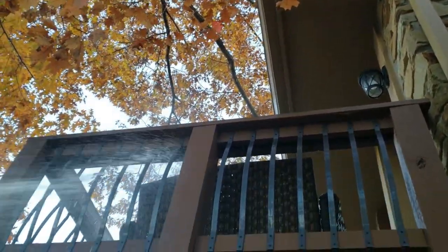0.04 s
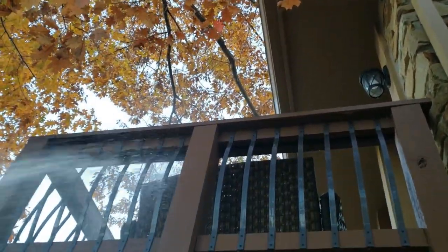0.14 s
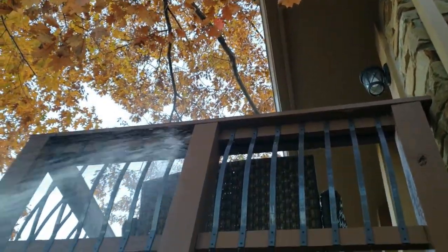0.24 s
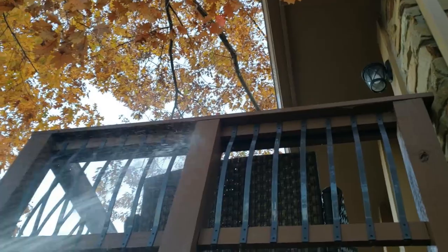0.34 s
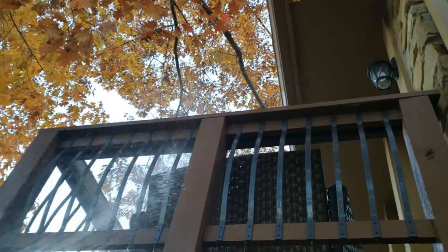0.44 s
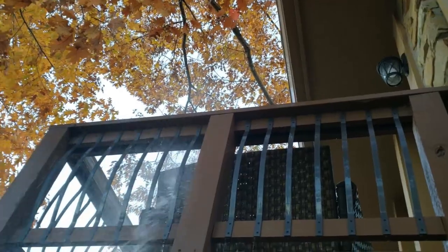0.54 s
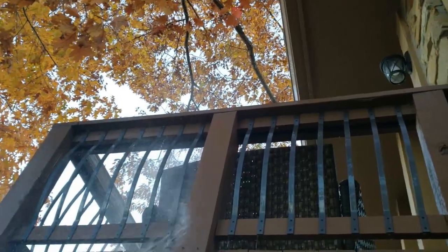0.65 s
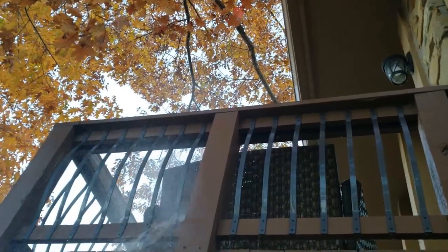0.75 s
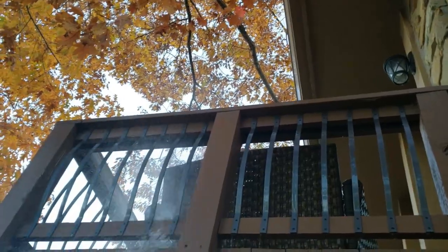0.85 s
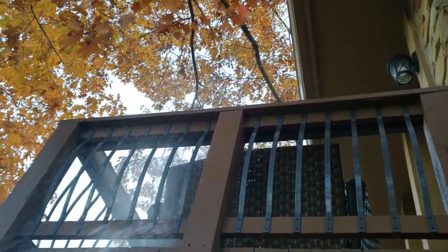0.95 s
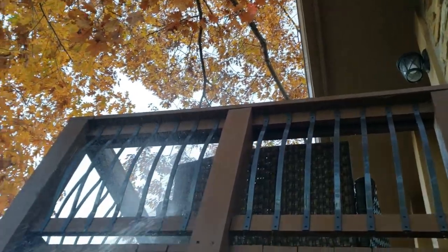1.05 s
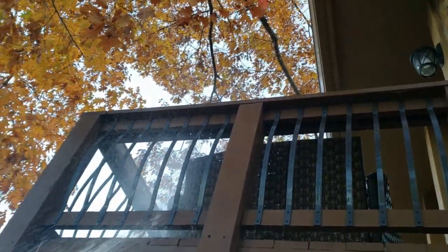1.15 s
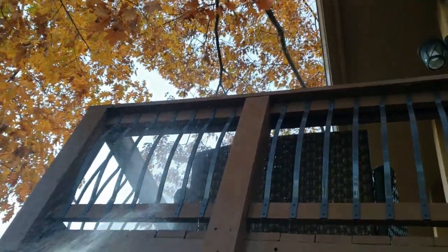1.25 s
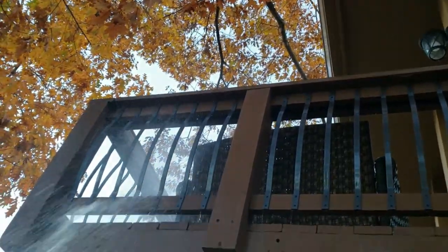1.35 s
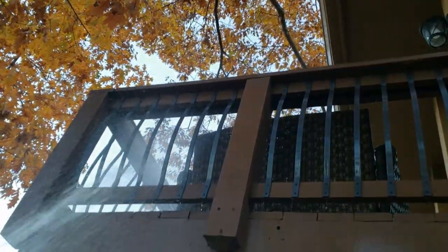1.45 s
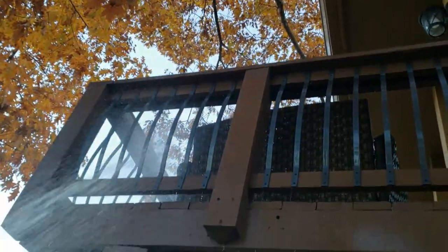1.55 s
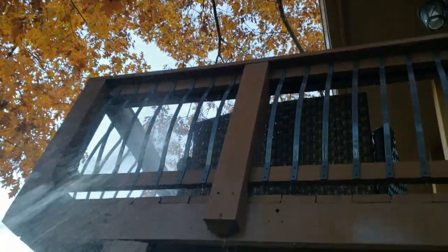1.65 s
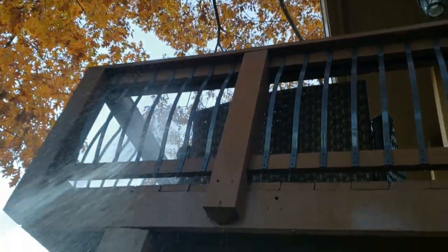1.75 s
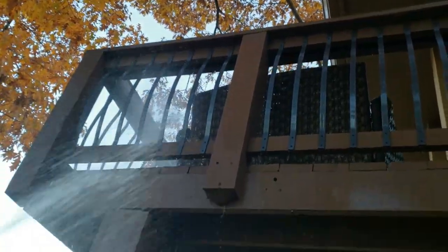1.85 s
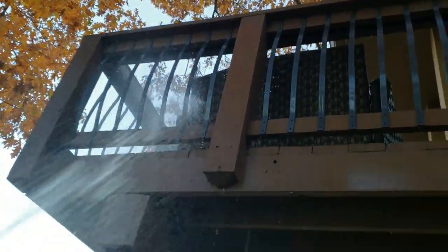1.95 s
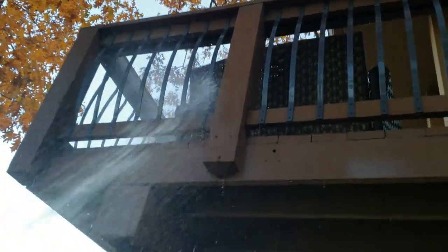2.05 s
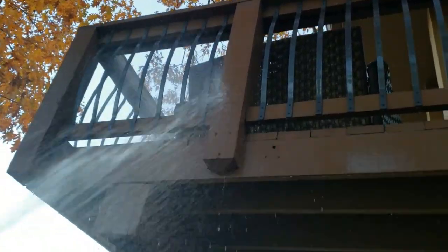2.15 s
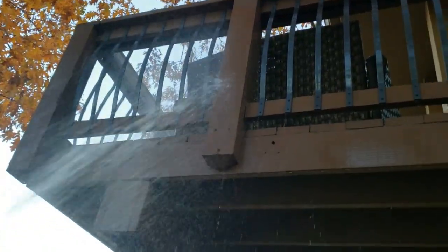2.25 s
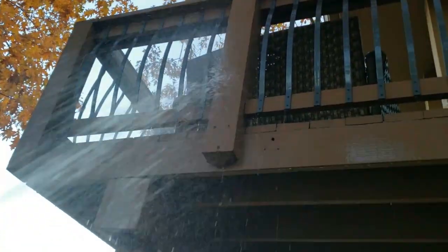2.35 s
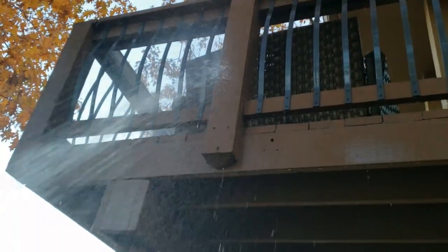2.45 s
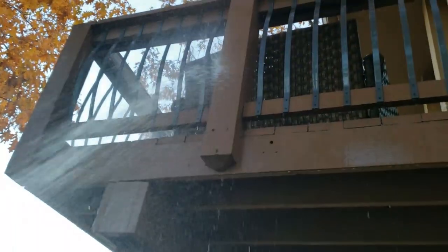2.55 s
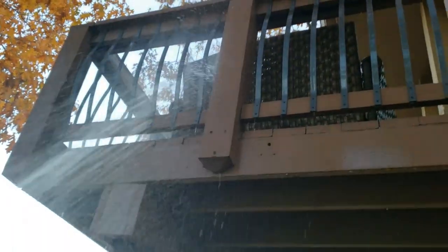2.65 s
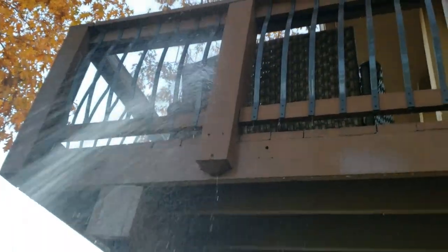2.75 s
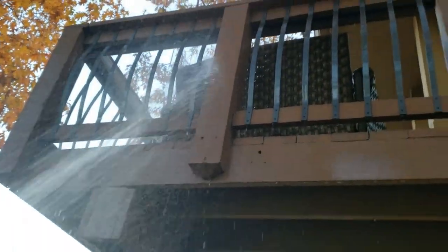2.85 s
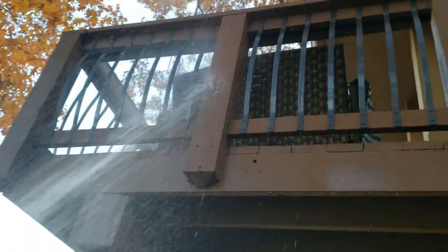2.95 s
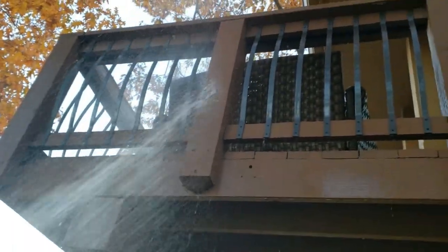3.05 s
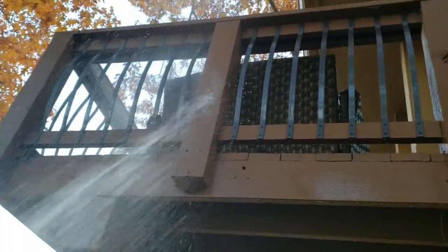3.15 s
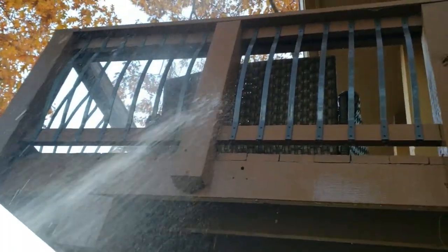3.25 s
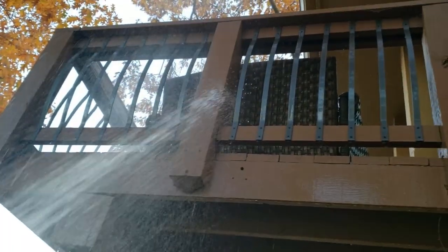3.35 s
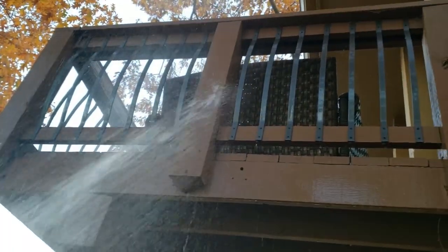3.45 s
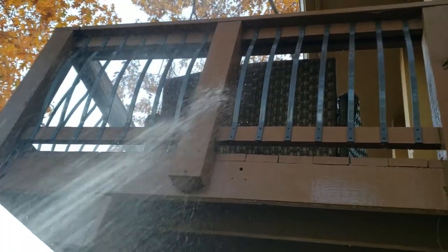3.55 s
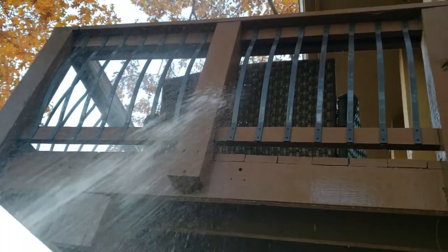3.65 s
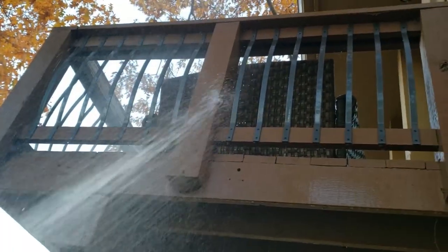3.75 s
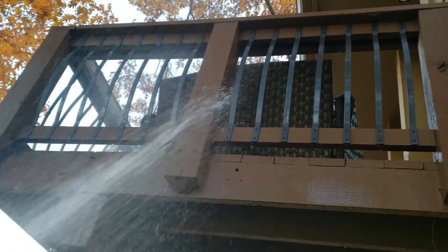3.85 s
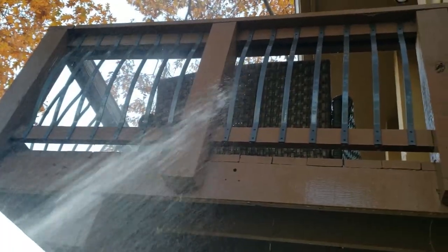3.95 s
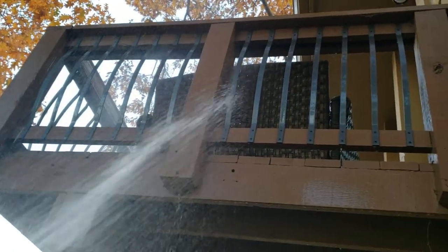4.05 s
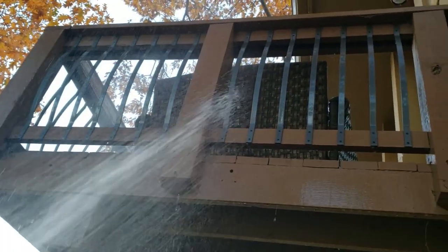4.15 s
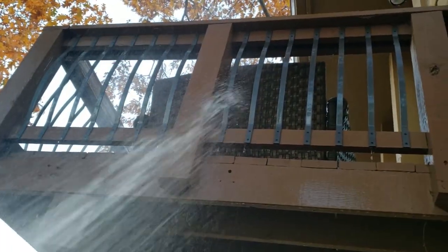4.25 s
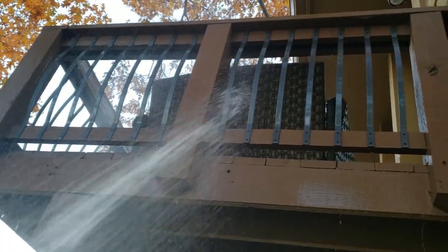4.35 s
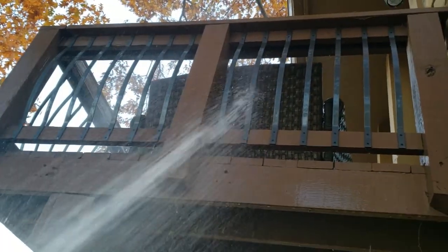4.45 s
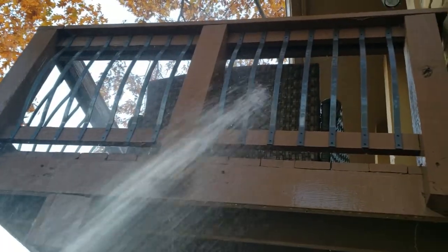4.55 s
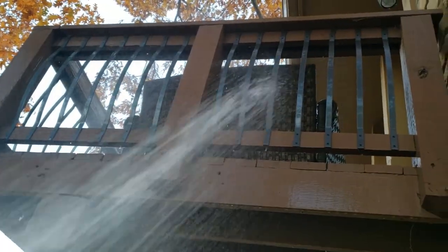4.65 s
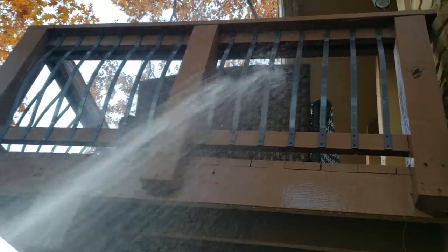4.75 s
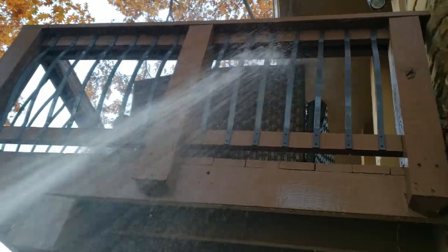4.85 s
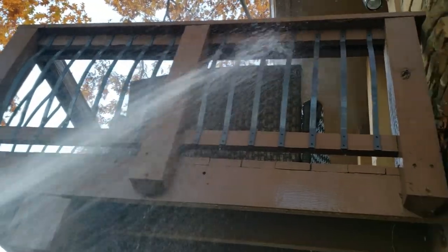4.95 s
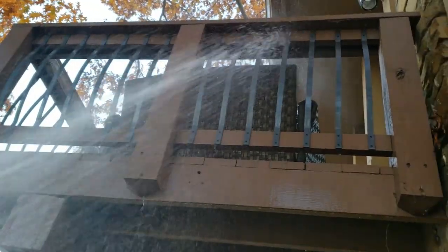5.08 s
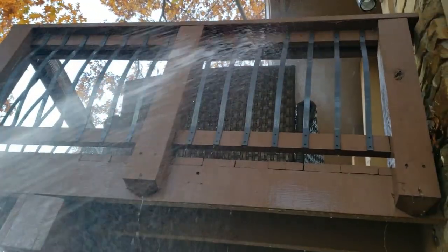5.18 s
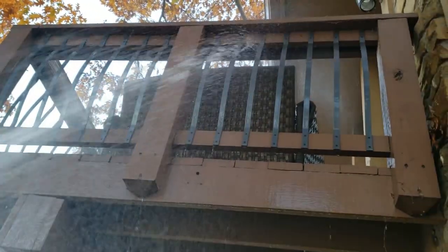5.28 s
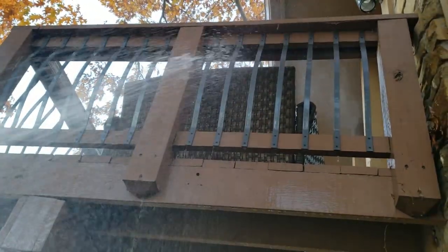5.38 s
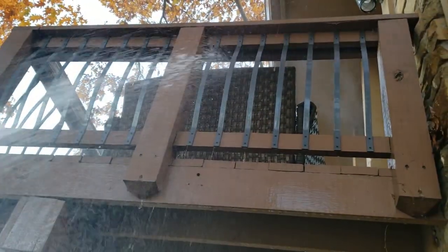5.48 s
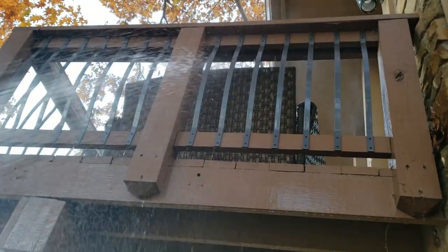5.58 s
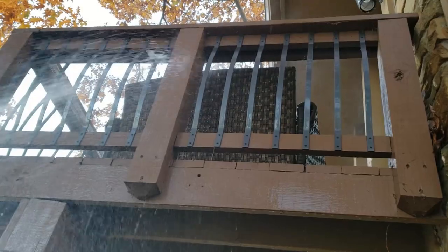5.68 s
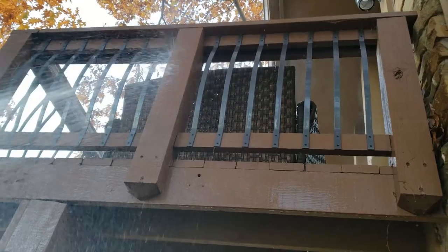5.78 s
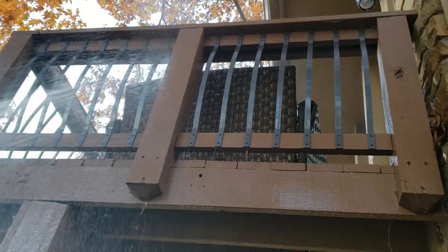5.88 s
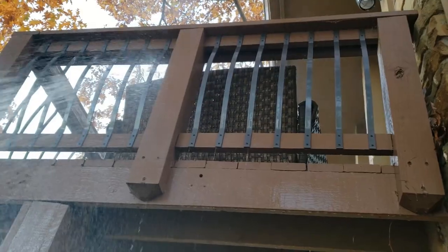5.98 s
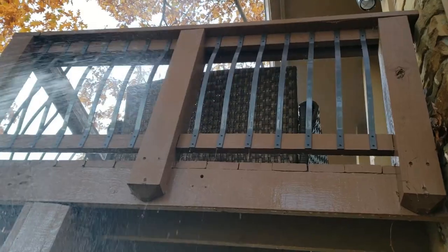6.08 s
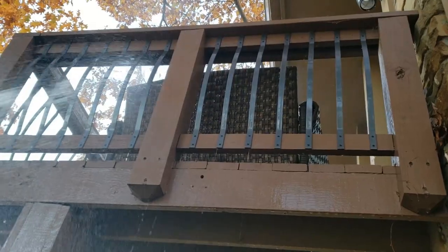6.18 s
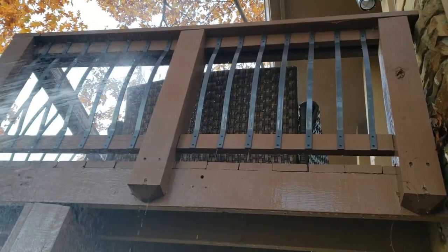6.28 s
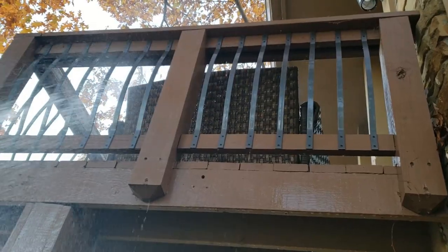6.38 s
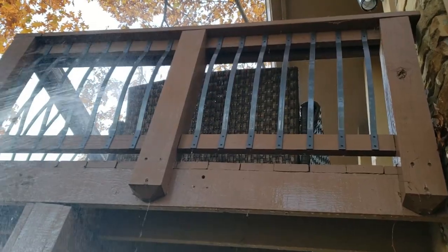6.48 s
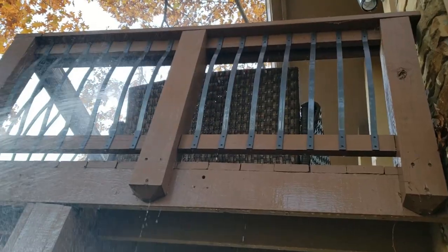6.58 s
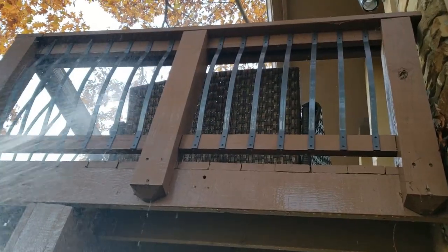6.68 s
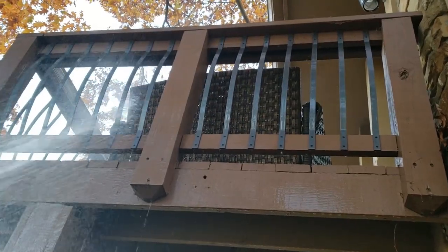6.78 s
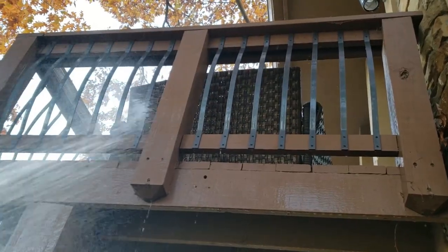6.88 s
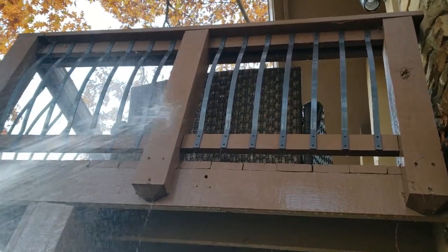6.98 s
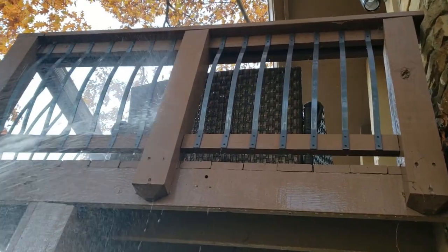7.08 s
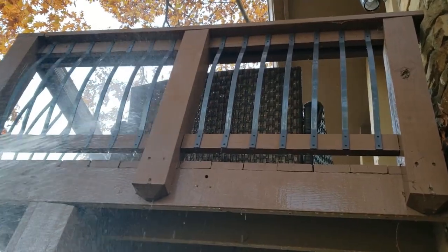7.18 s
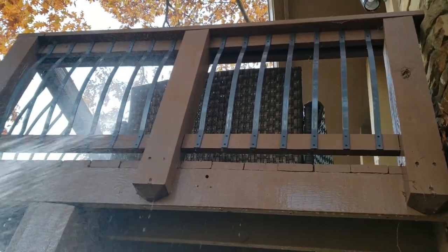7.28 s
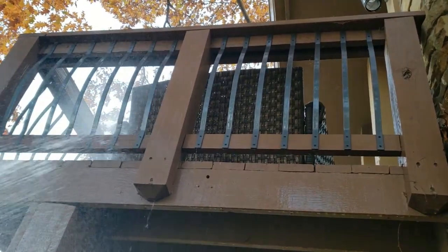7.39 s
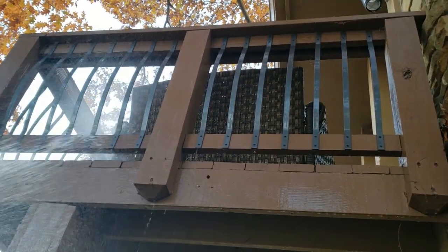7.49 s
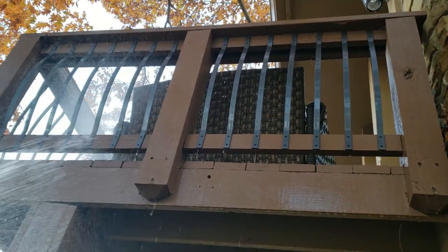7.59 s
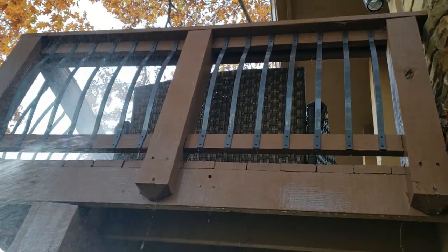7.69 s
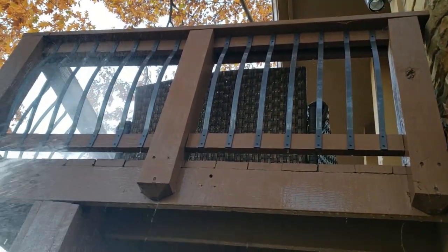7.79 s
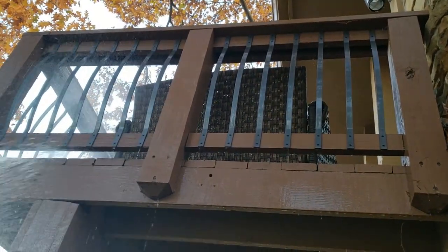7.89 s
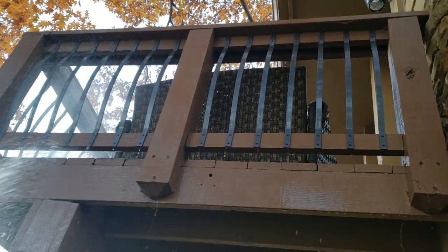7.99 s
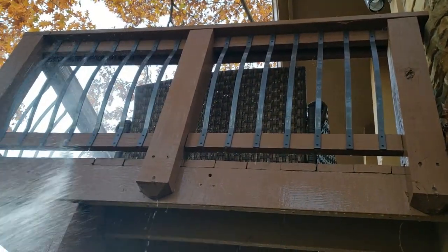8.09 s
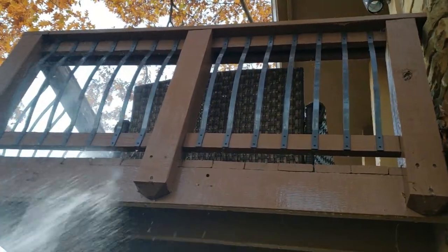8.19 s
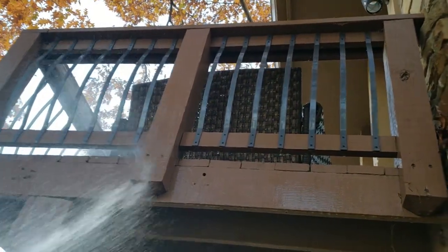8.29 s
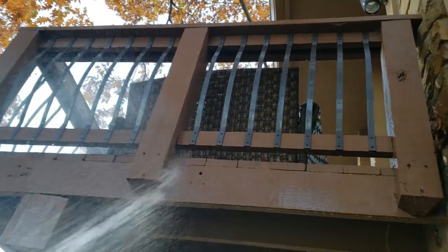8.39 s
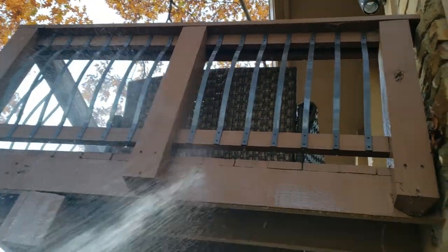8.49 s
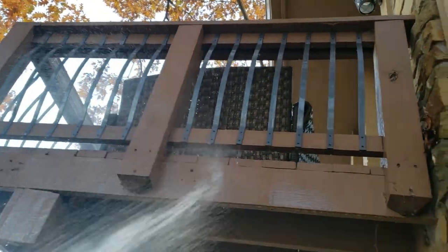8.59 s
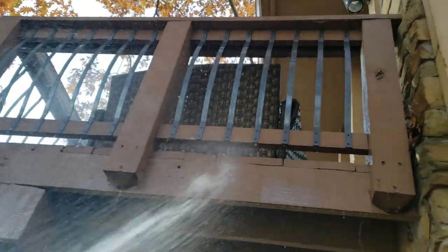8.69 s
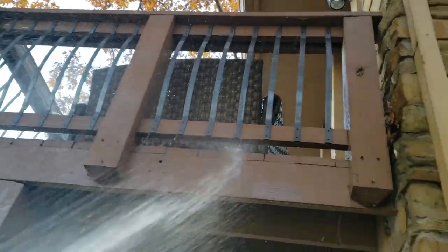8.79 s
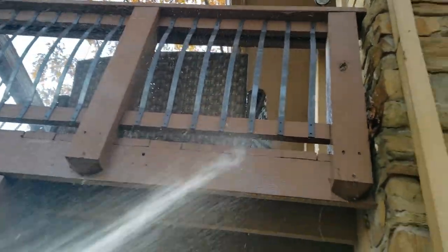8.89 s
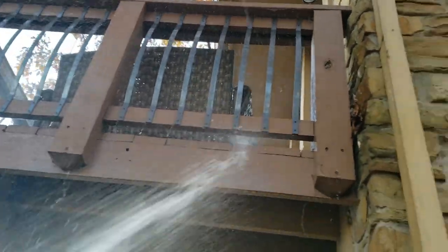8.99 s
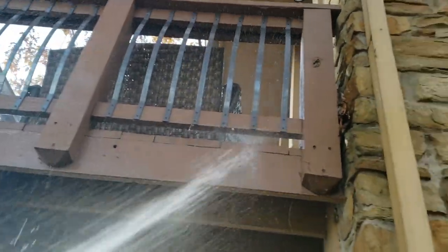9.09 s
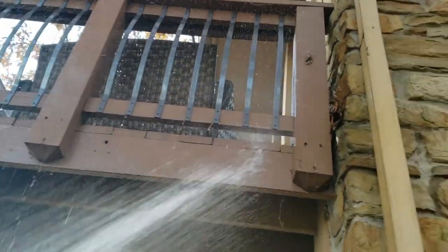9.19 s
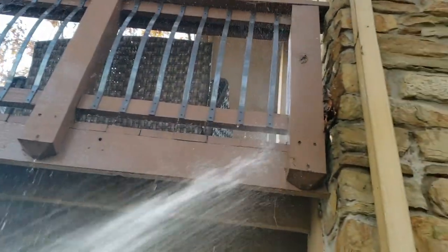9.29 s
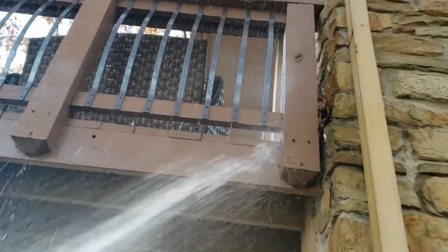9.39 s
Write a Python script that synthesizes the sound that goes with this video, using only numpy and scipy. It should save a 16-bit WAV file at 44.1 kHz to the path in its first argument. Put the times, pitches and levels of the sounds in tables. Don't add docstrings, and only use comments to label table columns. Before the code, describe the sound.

A pressurized water jet hisses loudly and steadily close by, drumming briefly on hollow wood, then slapping and pattering across deck boards over a faint engine drone.

```python
import sys
import numpy as np
from scipy import signal
from scipy.fft import rfft, irfft, next_fast_len
from scipy.io import wavfile
from scipy.ndimage import uniform_filter1d, map_coordinates

SR = 44100
rng = np.random.default_rng(int(sys.argv[2]) if len(sys.argv) > 2 else 0)


def dump(signal):
    limited = np.clip(np.atleast_2d(signal).T, -1, 1)
    pcm = np.round(limited * 32767).astype(np.int16)
    wavfile.write(sys.argv[1], SR, pcm)


def volts(x):
    e = np.asarray(x, float) / 20
    return 10 ** e


N = 415863
FRAME = 512

# start_s, force_db
JET_FORCE = [(0.05, 0.5), (.38, 2.5), (.6, 1), (1.1, 0), (1.7, 1), (2.2, 0.2), (2.85, 0.7), (3.15, 0),
             (3.35, 0.5), (4.4, 1.35), (4.95, 1), (5.6, -0.1), (6.2, -1), (6.45, 0), (6.8, -0.5),
             (7.45, -1), (8.2, 1.23), (9.3, 1.2)]
# pitch_hz, level_db (per Hz)
LEFT_COLOUR = [(700, -16.5), (1500, -19.5), (2100, -18), (2600, -15), (4000, -14), (5500, -14), (6300, -10),
               (7300, -3.5), (8400, -10), (9700, -8), (11000, -7.5), (13500, -7.5), (15500, -5.5)]
# pitch_hz, level_db (per Hz)
RIGHT_COLOUR = [(700, -20.5), (1500, -17), (2500, -10.5), (3300, -8.5), (4500, -5.5), (6500, -8.5),
                (7520, -18.5), (7900, -15), (10100, -10), (11000, -1.5), (12500, 1.5), (13500, -4),
                (14800, -.5), (15700, -1)]


def unit(x):
    return x / np.sqrt(np.mean(x ** 2) + 1e-20)


def columns(rows, at, scale=lambda v: v):
    first, *cols = np.transpose(rows)
    return [np.interp(scale(at), scale(first), c) for c in cols]


def log_hz(hz):
    return np.log(hz + 1)


def wobble(rate):
    at = np.arange(0, N + 12, 12)
    knots = rng.standard_normal(int(N * rate / SR) + 4)
    return np.interp(np.arange(N), at, map_coordinates(knots, [at * rate / SR]))


def short_time(x):
    hz, t, z = signal.stft(x, SR, nperseg=FRAME, noverlap=FRAME * 3 // 4)
    return hz[:, None], t, z


def samples(z):
    return signal.istft(z, SR, nperseg=FRAME, noverlap=FRAME * 3 // 4)[1][..., :N]


def pair(z, alike):
    angle = np.arccos(np.clip(alike, 0, 1)) / 2
    return np.cos(angle) * z[0] + np.sin(angle) * z[1] * [[[1]], [[-1]]]


def patches(shape, depth_db):
    field = uniform_filter1d(rng.standard_normal(shape), size=8, axis=0)
    field = uniform_filter1d(field, size=16, axis=1)
    return volts(depth_db * unit(field))


def coloured(gain, alike):
    m = next_fast_len(N)
    hz = np.fft.rfftfreq(m, 1 / SR)
    z = rfft(rng.standard_normal((2, m)))[:, None]
    return unit(irfft(pair(z, alike(hz))[:, 0] * gain(hz), m)[:, :N])


def jet():
    # pitch_hz, facing_rad, turned_away_rad
    shadow = [(100, 0, 0), (1000, -1.7, -1.5), (1950, -1.6, -1.2), (2400, -.5, -.9), (3000, -1.6, -1.4),
              (4600, -1.4, -1.2), (6400, -.7, -.9), (7300, -.6, -1.0), (7800, -4.0, -3.1),
              (9400, -4.1, -3.2), (9900, -4.2, -6.4), (13400, -3.2, -6.5), (14200, -6.6, -8.6)]
    # pitch_hz, facing (0-1), turned_away (0-1)
    likeness = [(500, .7, .7), (1200, .4, .5), (1850, .92, .76), (2300, .4, .55), (2800, .64, .7),
                (3600, .55, .66), (6000, .66, .7), (6900, .72, .62), (7500, .25, .25), (9200, .64, .55),
                (10300, .4, .42), (12500, .56, .58), (13800, .25, .4), (15000, .65, .45)]
    # start_s, left_lead_us
    hand_turn = [
        (.05, 470),
        (.24, 403),
        (1.3, 413),
        (1.75, 392),
        (4.25, 383),
        (4.72, 410),
        (4.95, 460),
        (7.5, 468),
        (7.9, 440),
        (9.35, 469),
    ]
    # start_s, treble_lift_db
    on_axis = [(.05, -4.5), (.45, -2.5), (.7, -2), (1.4, -0.7), (1.55, 1.5), (5, 1), (5.8, 1), (6, 0.5),
               (7.6, -2.5), (8.1, -1.2), (9.3, -1.6)]
    # start_s, level_db
    nearness = [
        (.05, 2),
        (.4, -1),
        (1, 0),
        (3.6, -0.35),
        (5, 0.75),
        (7.7, 1.5),
        (8.1, 2),
        (9.3, 3.5),
    ]

    flutter = volts(0.18 * wobble(6.3) + 0.32 * wobble(25) + 0.37 * wobble(150) + 0.6 * wobble(900))
    spit = volts(9 * np.clip(rng.random(N) - .998, 0, 1) / .002)
    hz, t, z = short_time(unit(flutter * spit * rng.standard_normal((2, N))))

    (body_db,), (lead_us,) = columns(JET_FORCE, t), columns(hand_turn, t)
    left_db = body_db + columns(nearness, t)[0]
    fizz_db = body_db + columns(on_axis, t)[0]
    turned = np.clip((lead_us - 410) / 45, 0, 1)

    facing, away = columns(shadow, hz, log_hz)
    phase = 2 * np.pi * hz * lead_us * 1e-6 + facing + turned * (away - facing)
    high = np.clip((hz - 7500) / 2500, 0, 1)
    right_db = body_db + high * (fizz_db - body_db)
    left = volts(columns(LEFT_COLOUR, hz, log_hz)[0] + left_db) * np.exp(.5j * phase)
    right = volts(columns(RIGHT_COLOUR, hz, log_hz)[0] + right_db) * np.exp(-.5j * phase)

    faint_lows = 1 / (1 + (700 / (hz + 1)) ** 2)
    alike_facing, alike_away = columns(likeness, hz, log_hz)
    z = pair(z, alike_facing + turned * (alike_away - alike_facing))
    z = z * patches(z.shape[1:], depth_db=0.7)
    return volts(-18.5) * samples(z * faint_lows * np.array([left, right]))


def drops():
    # start_s, peak_db, left_minus_right_db, pitch_hz, ping_share (0-1)
    fat_drops = [(.169, -12, -12, 3570, 0.53), (.343, -15.5, -1, 2400, 0.62),
                 (0.343, -17.5, -5, 2900, 0.47), (.377, -20, -7, 2930, .4), (.949, -22, -3, 2700, .5),
                 (1.775, -5, 0, 5730, 0.25), (1.84, -11, -3, 3360, .05), (3.173, -14.5, -9, 3440, 0.2),
                 (5.157, -15.5, 0, 3070, 0.44), (5.262, -15, 0, 7500, .2), (5.294, -13, 0, 7000, .05),
                 (5.387, -10, -1, 6600, 0.17), (8.916, -10, -3, 4000, .1)]
    bursts, pings = np.zeros((2, 2, next_fast_len(N + SR)))
    t = np.arange(SR // 20) / SR
    for s, db, pan_db, hz, share in fat_drops:
        burst = rng.standard_normal(len(t)) * t / .0004 * np.exp(1 - t / 0.00028)
        burst = burst / np.abs(burst).max()
        ping = np.sin(2 * np.pi * hz * t) * volts(-60 * t / 0.012) * (1 - np.exp(-t / 0.00055))
        share = np.clip(share, 0, 1)
        for side, lag, sign in ((0, 0, 1), (1, 17, -1)):
            at, gain = round(s * SR) + lag, volts(db + sign * pan_db / 2)
            bursts[side, at:][:len(t)] += gain * (1 - share) * burst
            pings[side, at:][:len(t)] += gain * share * ping
    hz = np.fft.rfftfreq(bursts.shape[1], 1 / SR)
    ports = volts([columns(LEFT_COLOUR, hz, log_hz)[0] + 7, columns(RIGHT_COLOUR, hz, log_hz)[0] + 4])
    return (irfft(rfft(bursts) * ports, bursts.shape[1]) + pings)[:, :N]


def post():
    # pitch_hz, width_hz, level_db
    post_modes = [
        (900, 270, -6.5),
        (1327, 130, -3.5),
        (1630, 360, -10),
    ]
    reach_s, strike_s, leave_s = 0.19, 0.32, 0.924
    strike_db, rise_db_per_s, sag_db_per_s, leave_db_per_s = -44.5, 90, 8.5, 500

    def modes(f):
        return sum(volts(db) * f * w / np.abs(c * c - f * f + 1j * f * w) for c, w, db in post_modes) ** 2

    t = np.arange(N) / SR
    late, gone = t - strike_s, np.clip(t - leave_s, 0, 1)
    slope = np.where(late < 0, rise_db_per_s, -sag_db_per_s)
    level_db = strike_db + slope * late - leave_db_per_s * gone
    unsteady_db = 1.1 * wobble(12.8) + 0.73 * wobble(39.4)
    return (t > reach_s) * volts(level_db + unsteady_db) * coloured(modes, lambda hz: .85)


def rails():
    # start_s, length_s, level_db, first_mode_hz, second_mode_hz
    rail_hits = [(0.245, .09, -49, 663, 950), (.5, .06, -54, 514, 930), (3.54, .15, -57, 760, 737),
                 (5.64, .06, -58, 640, 1140), (5.918, 0.066, -58, 674, 1240), (6.364, .05, -60, 610, 1310),
                 (6.5, 0.072, -58, 550, 1300), (6.75, .06, -56.5, 417, 1210), (7.04, .12, -61, 1110, 1200),
                 (8.75, 0.24, -59, 1130, 1190), (9.13, .05, -56, 1080, 1120)]
    # start_s, length_s, level_db
    beam_hits = [
        (3.598, .09, -54),
        (3.701, 0.085, -52.5),
        (7.02, 0.029, -51),
    ]
    beam_modes = [246, 248, 627]
    handrail_hz = 808

    out = np.zeros(N)
    crossings = [(*row, handrail_hz) for row in rail_hits] + [(*row, *beam_modes) for row in beam_hits]
    for s, length, db, *modes_hz in crossings:
        t = np.arange(round(length * SR)) / SR
        drift = np.cumsum(rng.standard_normal((3, SR // 4)), axis=1)[:, :len(t)] * .008
        ring = np.sin(2 * np.pi * np.outer(modes_hz, t) + drift).sum(0)
        out[round(s * SR):][:len(t)] += volts(db) * np.sin(np.pi * t / length) ** .5 * ring
    return out


def patter():
    # pitch_hz, level_db (per Hz)
    board_colour = [(18, -40), (30, -19), (102, 0), (127, -7.5), (182, -11), (236, -7.5), (292, -10.5),
                    (518, -16), (1270, -19.5), (1360, -26), (1500, -18.5), (1950, -15), (3300, -120)]
    # pitch_hz, share (0-1)
    board_likeness = [(60, 1), (150, 0.88), (300, 0.73), (700, 0.6), (1500, 0.25)]
    # start_s, level_db, length_s
    water_slaps = [(.26, -49.5, 0.13), (0.532, -53, 0.14), (1.085, -52, .1), (1.36, -49, .15),
                   (1.75, -49, .07), (1.85, -50, .06), (3.42, -55, 0.046), (3.65, -54, 0.19),
                   (4.1, -53, 0.65), (5.67, -60, .1), (5.96, -63, .06), (6.14, -61, .08), (6.38, -51, .06),
                   (6.54, -54, .1), (6.76, -59, 0.092), (7.05, -50.5, 0.11), (7.2, -53, 0.21),
                   (8.15, -54.5, 0.56), (8.866, -50.5, .1), (9.006, -55, .06), (9.19, -51.5, 0.14)]
    spray_db, spray_grows, rumble_db = -56.5, 1.5, -55.0

    def colour(hz):
        return volts(columns(board_colour, hz, log_hz)[0])

    def alike(hz):
        return columns(board_likeness, hz, log_hz)[0]

    t = np.arange(0, N, 32) / SR
    wash = coloured(lambda hz: colour(hz) / (1 + (250 / (hz + 1)) ** 4), alike)
    rumble = coloured(lambda hz: colour(hz) / (1 + (hz / 250) ** 4), alike)
    slaps = sum(volts(db) * np.exp(-(2 * (t - s) / length) ** 2) for s, db, length in water_slaps)
    steady = volts(spray_db + spray_grows * columns(JET_FORCE, t)[0])
    spray = np.interp(np.arange(N) / SR, t, np.hypot(steady, slaps))
    return spray * volts(0.91 * wobble(14)) * wash + volts(rumble_db) * rumble


def pump():
    # multiple (of firing rate), level_db (rms), unsteadiness (0-1)
    engine_orders = [(3.02, -64.5, 1), (4.02, -58, 0.76), (5.9, -59.5, 0.93), (6.94, -55.5, 0.36),
                     (7.92, -62.5, 0.53), (8.94, -67.5, 1), (13.99, -67, 0.52), (14.98, -67.5, 0.86),
                     (21.03, -67.5, 0.6), (84.5, -66.5, 0.5)]
    firing_hz = 16.17
    turns = np.cumsum(firing_hz * (1 + 0.001184 * wobble(1.5))) / SR
    apart = .017 * np.array([[1], [-1]])
    drone = np.zeros((2, N))
    for k, db, loose in engine_orders:
        level = volts(db + 1.5 + 5.0 * loose * wobble(4))
        cycles = k * turns + 0.21 * loose * wobble(7) + apart * wobble(2)
        drone += level * np.sin(2 * np.pi * cycles)
    return drone


def drop_drowned(x, under_db):
    hz, _, z = signal.stft(x, SR, nperseg=2048)
    power = uniform_filter1d(np.abs(z) ** 2, size=9, axis=1)
    power = np.abs(uniform_filter1d(power, size=2, axis=2))
    heard = power > power[::-1] * volts(-2 * under_db)
    keep = heard | (hz[:, None] < 1300) | (hz[:, None] > 10000)
    return signal.istft(z * keep, nperseg=2048)[1][:, :N]


def scene():
    ahead = post() + rails() + patter() + pump()
    return jet() + drops() + ahead * volts([[.85], [-.85]])


def top_cut(x):
    return signal.sosfilt(signal.butter(12, 17100, fs=SR, output="sos"), x)


def record(dry):
    top_hz = 15760
    m = next_fast_len(N)
    limited = irfft(rfft(dry, m) * (np.fft.rfftfreq(m, 1 / SR) < top_hz), m)
    left, right = drop_drowned(limited, under_db=12)
    mid, side = drop_drowned(np.array([left + right, left - right]) / 2, under_db=6.6)
    return top_cut(np.array([mid + side, mid - side]))


dry = scene()
out = record(dry)
dump(out)
```